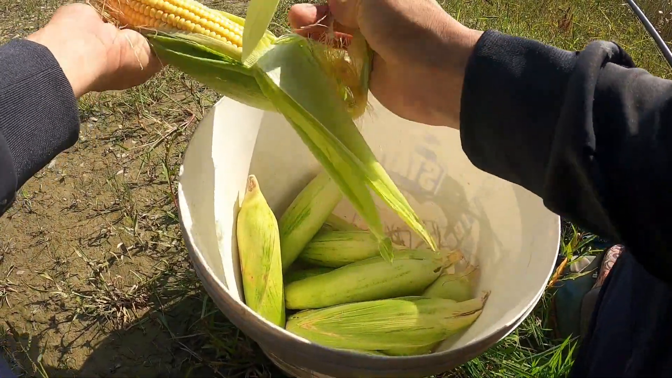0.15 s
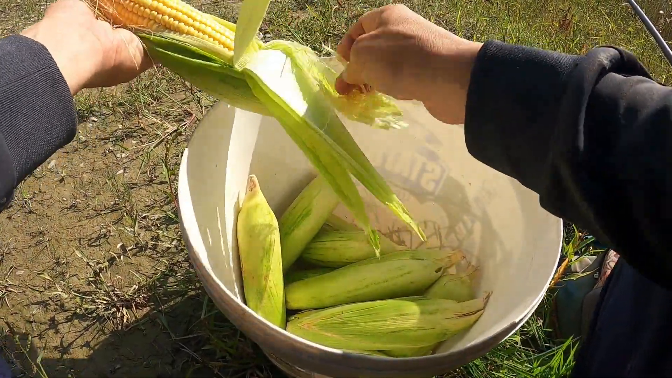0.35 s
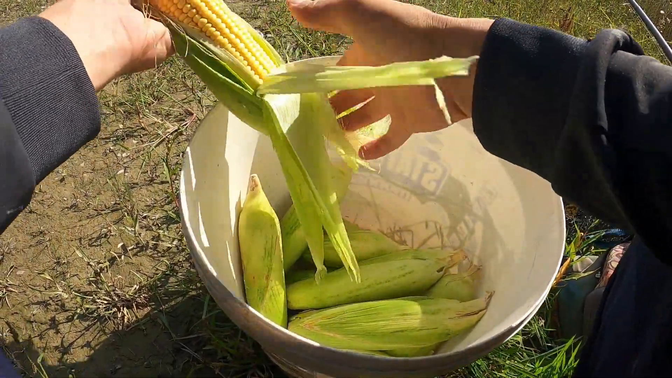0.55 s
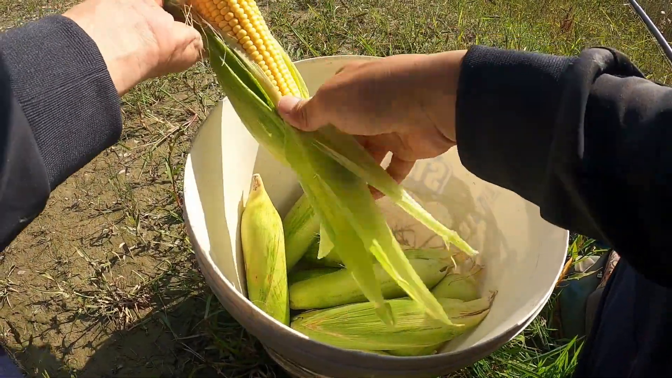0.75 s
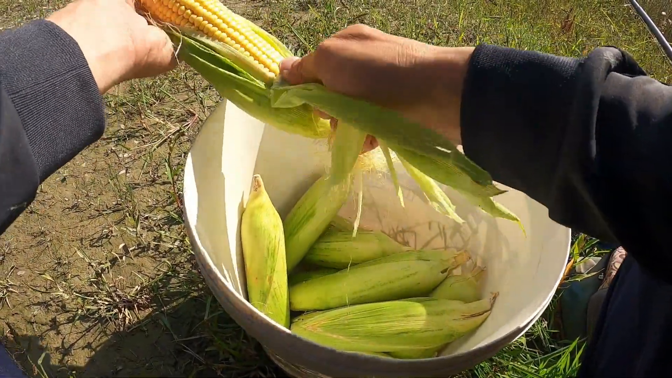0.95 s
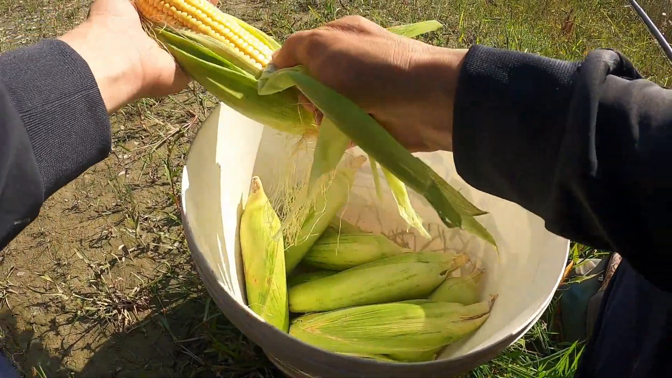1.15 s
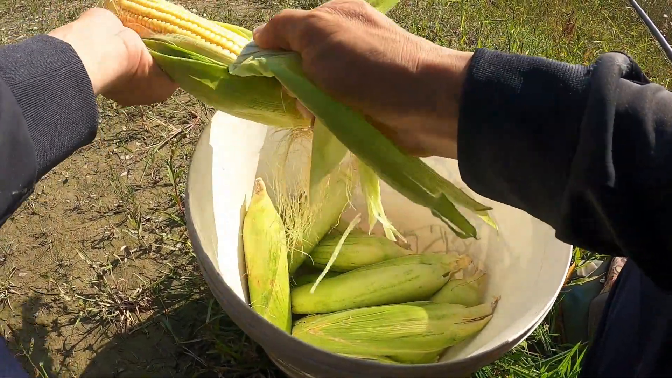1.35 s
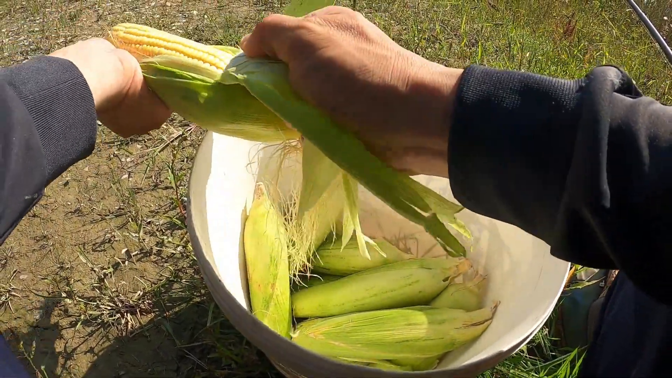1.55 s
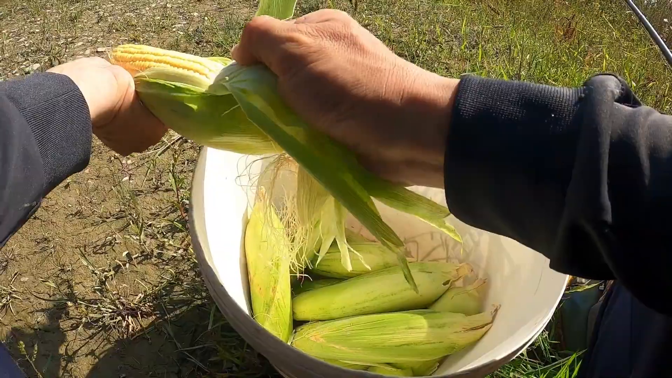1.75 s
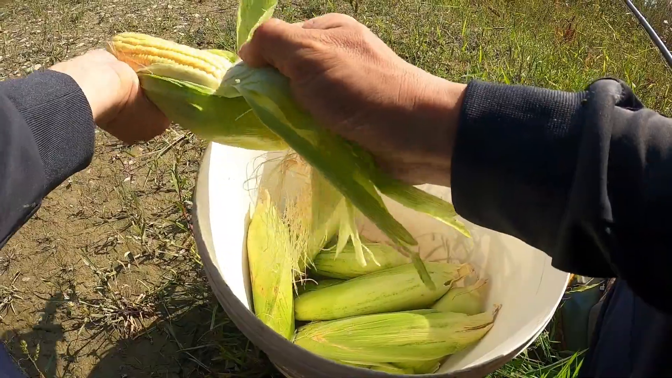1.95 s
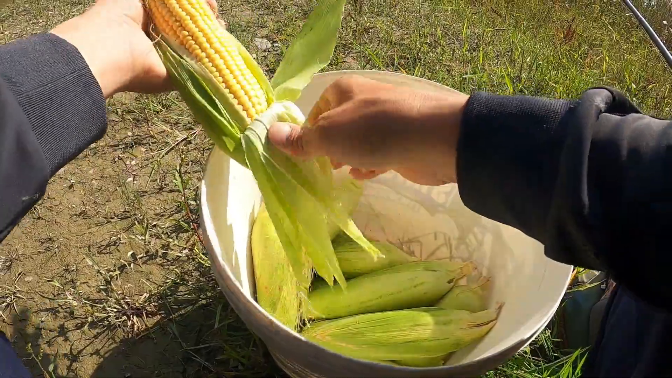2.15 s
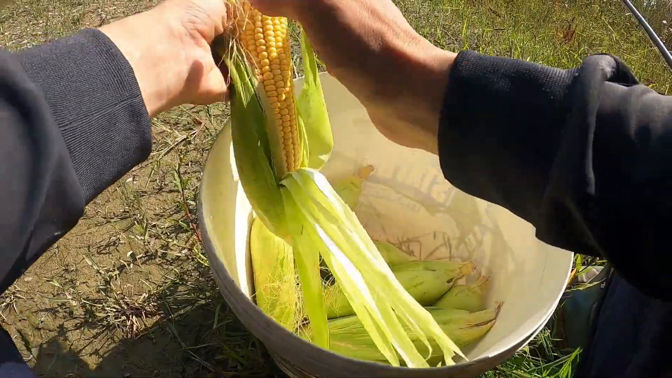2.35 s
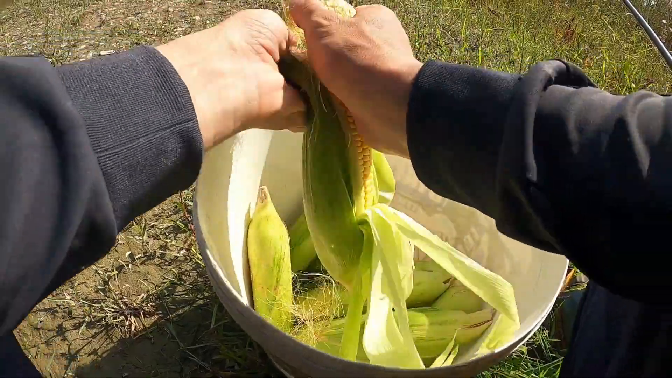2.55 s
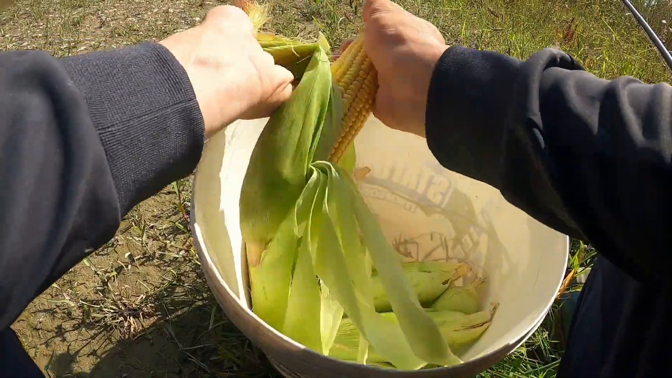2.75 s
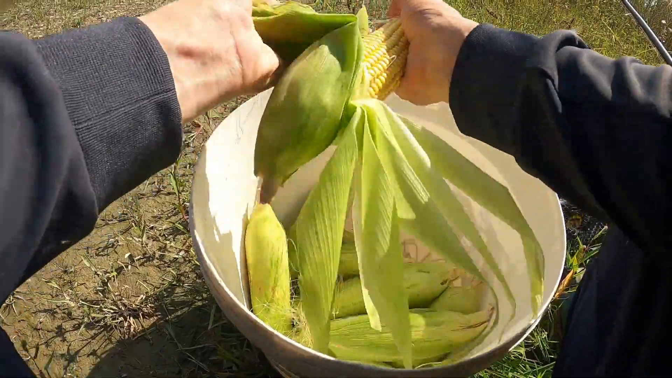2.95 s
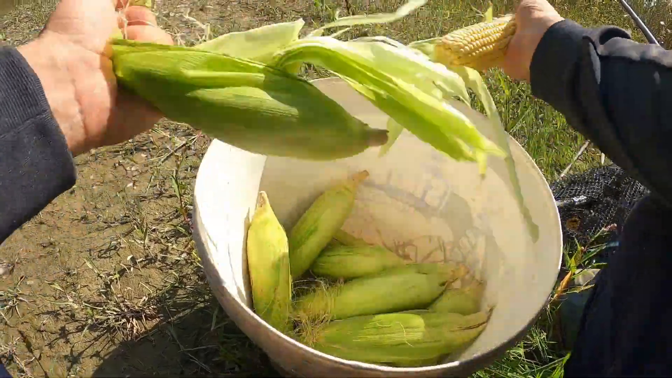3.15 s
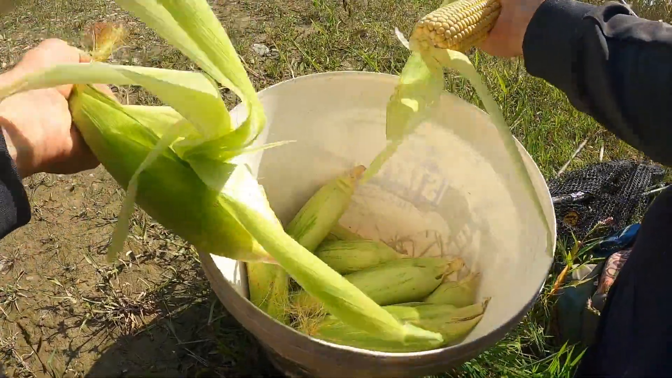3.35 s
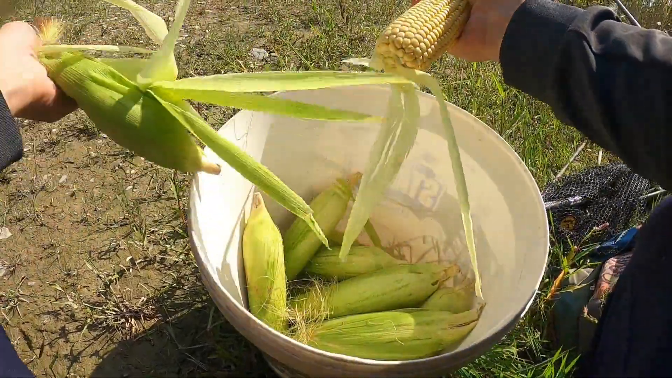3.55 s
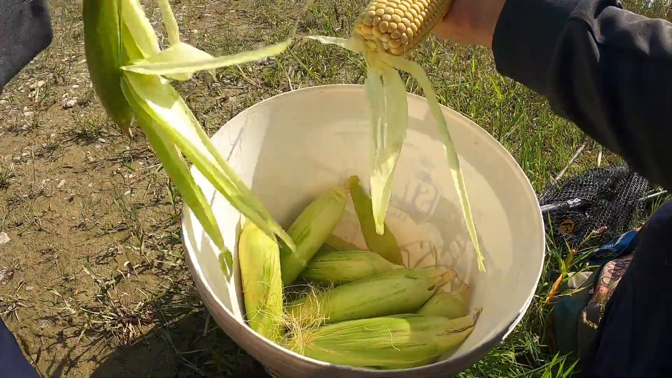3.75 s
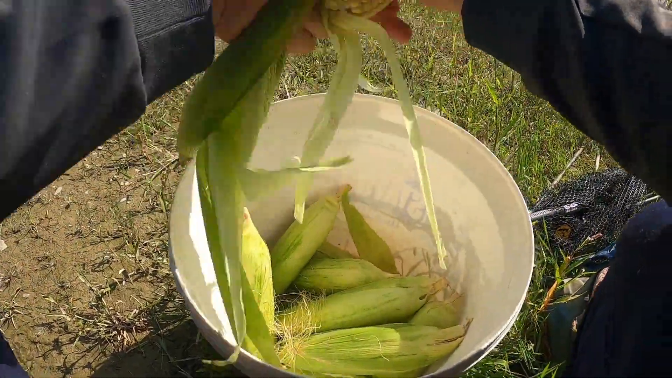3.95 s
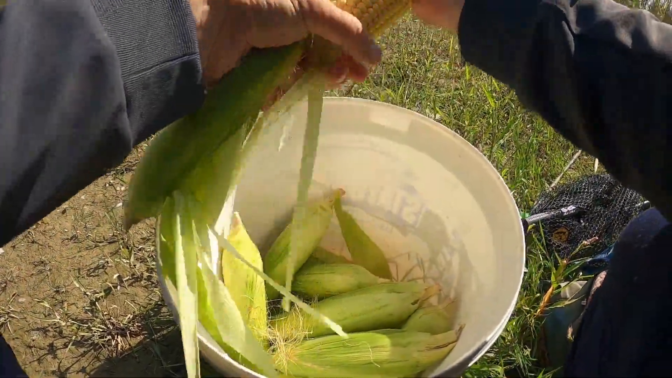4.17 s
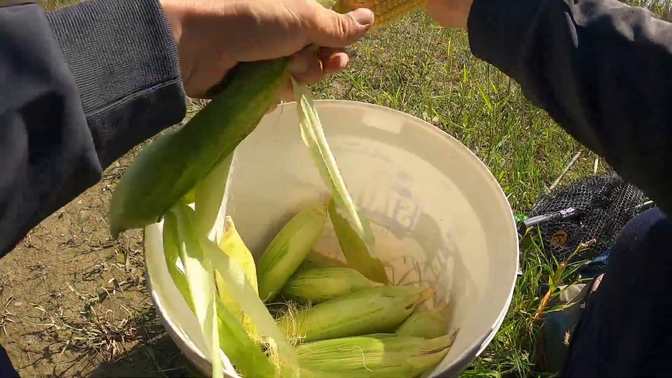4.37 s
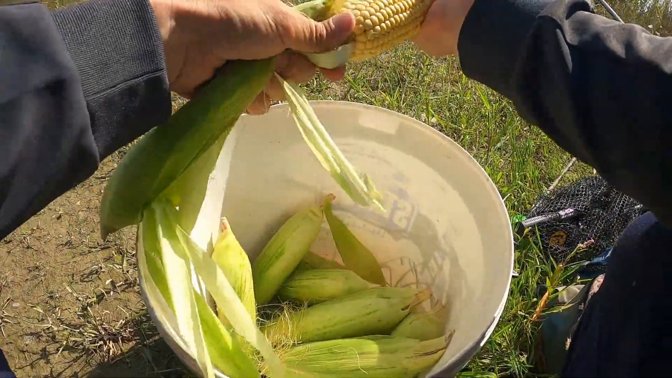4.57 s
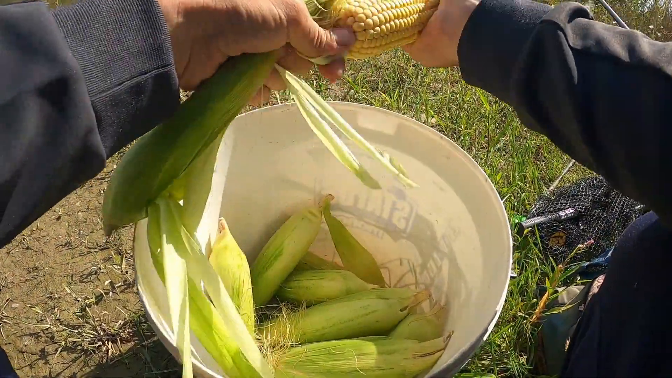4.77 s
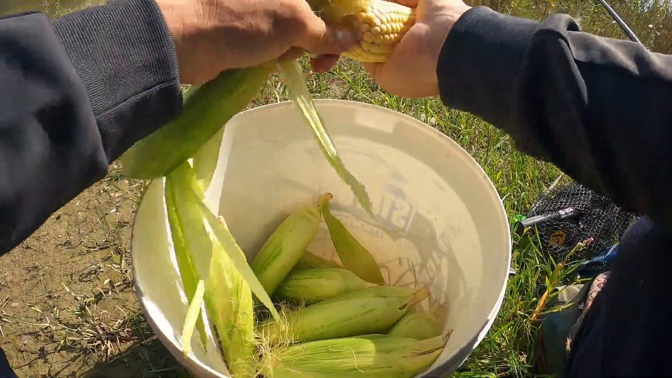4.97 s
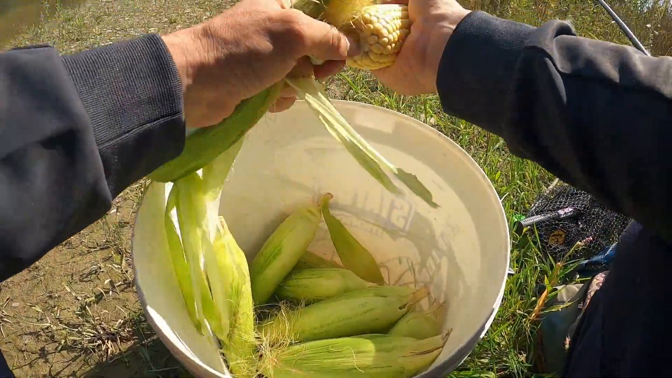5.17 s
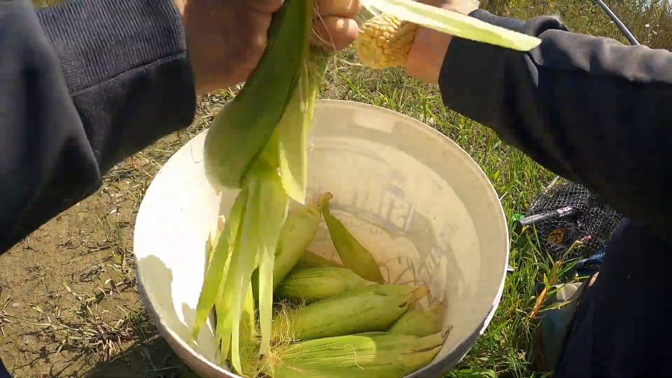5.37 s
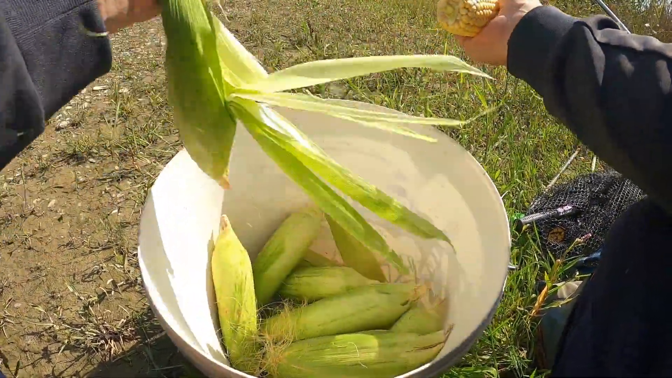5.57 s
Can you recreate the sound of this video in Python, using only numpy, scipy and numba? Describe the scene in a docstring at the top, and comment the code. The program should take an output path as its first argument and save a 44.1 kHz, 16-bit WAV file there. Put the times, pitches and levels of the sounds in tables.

```python
"""Hands strip fresh husks from a corn cob over a plastic bucket, outdoors, close to two microphone ports.
Soft rustling comes first, with light snaps; near 1.7 s sharper snaps and wind join in.
From 2.7 to 3.4 s the leaves creak and tear hardest; blows make the bucket boom from about 3.2 s,
during the tearing, and again near 3.7 and 4 s. Gentle rustling follows, and bright snaps and knocks near 5.4 s.
Tearing is built from tiny decaying sines and noise, knocks from ringing modes, wind from shaped noise."""
import sys
import numpy as np
from scipy import signal
from scipy.fft import rfft, irfft, next_fast_len
from scipy.io import wavfile
from scipy.ndimage import uniform_filter1d, map_coordinates
from numba import njit

SR = 44100
rng = np.random.default_rng(int(sys.argv[2]) if len(sys.argv) > 2 else 0)


def materialize(psi):
    """Save the field psi as 16-bit PCM at rate SR to the path in sys.argv[1].

    A 1-D psi becomes a single channel; in a 2-D psi each row is a channel.
    """
    bounded = np.clip(np.atleast_2d(psi).T, -1, 1)
    quanta = np.round(bounded * 32767).astype(np.int16)
    wavfile.write(sys.argv[1], SR, quanta)


N = 247401  # length in samples

# Separate rubs and rips of the leaves. Each row: start of full level in seconds, time held in seconds,
# crackle level in dB, creak level in dB above the crackle.
LEAF_STROKES = [(0.0, 0.092, -55, -7), (0.189, 0.15, -54, -14), (0.441, 0.045, -56.5, -23),
                (0.693, 0.038, -53, -4), (0.78, .06, -54, -6), (0.869, 0.075, -42, -8),
                (0.97, 0.13, -51.5, -2), (1.097, 0.085, -48, -7.5), (1.35, 0.062, -47, -17),
                (1.481, 0.27, -55, -7.5), (1.803, 0.1, -43.5, -11.5), (2.091, 0.09, -53, -5),
                (2.189, 0.029, -51, 6), (2.292, 0.051, -45, -1), (2.472, 0.39, -52, -5.5),
                (2.702, 0.098, -40, 0.5), (2.831, 0.082, -42, -1), (2.937, 0.027, -30, 0),
                (2.995, 0.011, -35.5, 7), (3.025, 0.095, -33.5, 5.5), (3.17, 0.012, -29.5, 2),
                (3.202, 0.028, -30.5, 2), (3.25, 0.071, -46, 0.5), (3.319, 0.037, -47.5, 4),
                (3.4, 0.055, -58, 2), (3.498, 0.073, -53, 6), (3.633, 0.031, -42.5, 5),
                (3.699, 0.093, -53.5, 8), (3.842, 0.148, -51.5, -4.5), (4.03, 0.0088, -41, 1),
                (4.101, 0.14, -55.5, 0), (4.232, .15, -45, -1), (4.431, 0.044, -52, 1.5),
                (4.504, 0.0094, -43, -26), (4.56, 0.17, -59.5, -1), (4.82, 0.049, -60, -4),
                (4.921, 0.21, -55.5, 4.5), (5.15, 0.12, -63, -26.5), (5.3, 0.073, -52, 0),
                (5.402, 0.037, -42.5, -4.5), (5.5, 0.052, -54.5, -0.5), (5.598, 0.018, -45.5, 2.5)]
# Tone of the fine crackle. Each row: frequency in Hz, relative level in dB.
CRACKLE_TONE = [(410, -26), (911, -86), (1370, -53), (1590, -8.5), (2580, -10), (3400, -4.5), (4550, -0.5),
                (7510, -14), (9040, -14), (12200, -26.5), (15100, -17), (16400, -43)]
# Drifting centre of the creaking. Each row: time in seconds, pitch in Hz.
CREAK_CENTRE = [(0, 1720), (2.7, 1940), (2.97, 1900), (3.02, 1230), (3.62, 1696), (3.72, 1090), (4.2, 1650),
                (5.61, 1750)]
# Leaves brushing the bucket wall. Each row: time in seconds, level in dB.
WALL_BRUSHING = [(0.0, -60.5), (0.42, -74.5), (0.84, -61), (0.92, -46), (1.15, -73.5), (2.05, -76),
                 (2.2, -46), (2.27, -59), (2.36, -47), (2.43, -67), (2.9, -49.5), (3.18, -37), (3.45, -60),
                 (3.73, -37.5), (3.82, -48.5), (4.0, -61), (4.07, -42), (4.16, -65), (4.3, -47),
                 (4.68, -76), (5.0, -64), (5.28, -71.5), (5.33, -53), (5.47, -42), (5.55, -66), (5.61, -33)]
# Fibres that snap. Each row: start in seconds, level in dB, treble in dB above that level.
FIBRE_SNAPS = [(0.03, -37.5, -10), (0.051, -37.5, -13), (0.1143, -35.5, -25), (0.1605, -21.5, 9),
               (0.2049, -32.5, -16), (0.8661, -37, -22), (0.9308, -38, -30), (0.9976, -26.5, -21),
               (1.3523, -38.5, -22), (1.365, -38, -15), (1.46, -21.5, 2.5), (1.5847, -21, -9),
               (1.6423, -30.5, -3), (1.6866, -11, -2.5), (1.7034, -26, -17), (1.7998, -29, 3),
               (1.816, -32, -12), (1.8397, -20.5, 0), (1.8587, -11, -10), (1.8824, -21, -22),
               (1.8901, -21.5, -1), (1.943, -35, 7), (1.968, -36.5, -25), (1.9978, -38, 4),
               (2.02, -41.5, 3), (2.368, -30.5, -2.5), (2.443, -35.5, -19), (2.7412, -21.5, -6),
               (2.7607, -16, -43), (2.9354, -21, -19), (2.9438, -14, -19), (2.9554, -17, -17),
               (2.9654, -15.5, -14.5), (3.1712, -11, -13), (3.2007, -23, -6), (3.2106, -7, -7),
               (3.2204, -19, -30), (3.337, -11.5, -35), (3.3747, -24, -7), (3.8667, -29.5, -9),
               (3.9182, -30.5, 0), (4.0253, -21.5, -20), (4.2726, -29, -8), (4.3596, -27, -2),
               (5.0948, -32, 10), (5.1891, -50.5, 25), (5.3984, -36.5, 24), (5.4204, -25.5, 6),
               (5.4292, -18.5, 10.5), (5.5932, -24.5, -11)]
# A leaf slips and creaks at one pitch. Each row: start in seconds, level in dB, pitch in Hz.
LEAF_CREAKS = [(0.161, -18, 1940), (1.841, -24, 1800), (1.858, -17, 1050), (2.209, -15, 1885),
               (2.695, -14.5, 1595), (2.708, -7, 2020), (2.727, -8, 2060), (2.739, -3.5, 1710),
               (2.756, 0, 2110), (2.794, -7, 1670), (2.945, -13, 1046), (2.992, -15.5, 980),
               (3.021, -10, 1000), (3.042, -4.5, 1560), (3.065, -0.5, 1990), (3.078, -21, 1020),
               (3.092, -5, 1040), (3.107, -13, 950), (3.119, -6, 1010), (3.156, -7, 1495),
               (3.181, -13, 1150), (3.705, -19.5, 1030), (3.78, -24.5, 1020), (3.316, -5.5, 1215),
               (3.337, -8.5, 913)]
# Blows on the bucket. Each row: start in seconds, level in dB, deep thud in dB above it, rim in dB above it.
BUCKET_BLOWS = [(0.865, -35, -46, -40), (0.942, -35, -51, 0.5), (1.858, -37.5, -24, -5),
                (3.172, -18, -12, 10), (3.214, -16.5, -4, 6.5), (3.319, -21, -11, -3),
                (3.341, -20, -0.5, 0), (3.692, -21.5, -28, 6), (3.715, -31.5, -34, 2),
                (4.027, -11, -22.5, 3.5), (4.27, -33, -5, 2), (5.422, -20.5, -14, -1.5),
                (5.434, -18, -14.5, 4.5), (5.457, -22, -37, 3.5)]
# Ringing of the bucket's body. Each row: frequency in Hz, relative level in dB, time to fall 60 dB in seconds.
BODY_MODES = [(129.4, -19, 0.275), (221, -14, 0.31), (248, 3, 0.11), (318.6, 9, 0.035), (409.6, -5, 0.079)]
# Ears shifting in the bucket. Each row: frequency in Hz, relative level in dB, time to fall 60 dB in seconds.
THUD_MODES = [(52.4, -2, 0.071), (71.8, 6.5, 0.095), (108, 11, 0.042)]
# Ringing of the stiff rim. Each row: frequency in Hz, relative level in dB, time to fall 60 dB in seconds.
RIM_MODES = [(432, -3, 0.052), (552.2, 2.5, 0.033), (778, -3, 0.031), (970, -2, 0.024), (1086, -6, 0.048),
             (1372, -5.5, 0.026), (1930, -10, 0.02)]
# Wind on the ports. Each row: time in seconds, rumble level in dB, flutter level in dB.
WIND_LEVELS = [(0.0, -53.5, -79), (0.62, -60.5, -97.5), (0.86, -60.5, -88), (1.27, -54, -98),
               (1.62, -54.5, -78), (1.74, -41.5, -54), (1.9, -37.5, -57), (2.03, -45, -53),
               (2.2, -56.5, -76), (2.33, -38.5, -49), (2.73, -47.5, -75.5), (3.11, -57, -69),
               (3.23, -33, -54), (3.28, -60, -52), (3.36, -39, -48.5), (3.47, -60.5, -57),
               (3.94, -46.5, -55), (4.89, -48.5, -70), (5.26, -41, -59.5), (5.61, -46, -64)]
# Tone of the low wind rumble. Each row: frequency in Hz, relative level in dB.
RUMBLE_TONE = [(10, -10.5), (25, -1.5), (45, -5.5), (62, -18), (120, -61.5)]
# Tone of the higher wind flutter. Each row: frequency in Hz, relative level in dB.
FLUTTER_TONE = [(30, -9), (60, 8.5), (100, 16), (160, -4), (400, -67)]
# Tone of the open-air background. Each row: frequency in Hz, relative level in dB.
OPEN_AIR_TONE = [(110, -28), (160, -1), (400, -11.5), (800, -26.5), (1500, -16), (2600, -23), (5000, -21),
                 (12000, -38.5), (16400, -68)]
# Response shared by both ports. Each row: frequency in Hz, gain in dB.
PORT_RESPONSE = [(100, 1), (12000, 1.5), (15000, -10.5), (16500, -26)]
# How the right port differs. Each row: frequency in Hz, gain in dB over the left.
RIGHT_OVER_LEFT = [(100, 0), (5000, -0.5), (8000, 5), (15000, 5)]

TOP_HZ = 16500  # nothing is kept from here up
ATTACK_S, RELEASE_S, REST_DB = 0.06, 0.101, -80.5  # a stroke climbs from the resting rustle and returns to it
RIP_FROM_DB = -41  # crackle above this level counts as a hard rip
RIP_SNAPS_PER_S = 120  # chance snaps a second in hard rips
GENTLE_SHARE = .14  # share of them left in gentle strokes
RIP_SNAP_DB, RIP_TREBLE_DB = 12, -11  # greatest level over the crackle; treble over the snap's own level


def amp(db):
    """Turns dB into a plain gain."""
    return 10 ** (np.asarray(db) / 20)


def unit(x):
    """Scales x to an average strength (rms) of 1."""
    return x / np.sqrt(np.mean(x ** 2) + 1e-20)


def along(points, hz):
    """Reads a curve of (Hz, value) points on a log frequency axis."""
    f, v = np.transpose(points)
    return np.interp(np.log(hz + 1), np.log(f + 1), v)


def curves(rows):
    """Gives one value per sample for each column after the time."""
    s, *cols = np.transpose(rows)
    return [np.interp(np.arange(N) / SR, s, c) for c in cols]


def wobble(rate):
    """A smooth random curve with `rate` random points a second."""
    points = rng.standard_normal(int(N * rate / SR) + 4)
    return map_coordinates(points, [np.arange(N) * rate / SR])


def filtered(x, response):
    """Shapes x by a gain that depends on frequency."""
    m = next_fast_len(N + SR // 2)
    return irfft(rfft(x, m) * response(np.fft.rfftfreq(m, 1 / SR)), m)[..., :N]


def pair(alike):
    """Two white noises, one per port; alike is their correlation."""
    a, b = rng.standard_normal((2, N))
    turn = np.arccos(np.clip(alike, -1, 1)) / 2
    shared, own = np.cos(turn) * a, np.sin(turn) * b
    return np.array([shared + own, shared - own])


@njit
def add(out, start, step, fade, rise, size):
    """Adds damped sines to out: each swells, then dies away; times are in samples."""
    for g in range(len(start)):
        first = int(start[g]) + 1
        for n in range(max(first, 0), min(first + int(6 / fade[g]), len(out))):
            t = n - start[g]
            envelope = np.exp(-fade[g] * t) * (1 - np.exp(-t / rise[g]))
            out[n] += size[g] * np.sin(step[g] * t) * envelope


def rings(s, hz, t60, db, rise, lag, pan_db):
    """Damped sines at both ports: the left hears each up to lag seconds later and pan_db louder."""
    values = np.broadcast_arrays(s, hz, t60, db, rise, lag, pan_db)
    s, hz, t60, db, rise, lag, pan_db = [np.ravel(v) * 1. for v in values]
    lag = lag / (1 + (hz / 8000) ** 2)  # high pitches lag less
    step = 2 * np.pi * np.clip(hz, 20, SR / 2.2) / SR
    fade = np.log(1000) / np.clip(t60, 1e-4, 1) / SR
    rise = np.clip(rise, 1e-5, 1) * SR
    out = np.zeros((2, N))
    for port, side in zip(out, (.5, -.5)):
        add(port, (s + side * lag) * SR, step, fade, rise, amp(db + side * pan_db))
    return out


def handling():
    """Rubbed and torn leaves give fine crackle and coarser creaking, and set the bucket wall humming."""
    crackle_db, creak_db = stroking()
    # gentle strokes mostly slide, hard ones break fibres
    torn = np.clip((crackle_db + 80) / 55, .2, .9)
    jerks = unit(amp(5 * torn * wobble(75)))  # fibres give way in jerks
    leaves = amp(crackle_db) * leaf_crackle(torn) + amp(creak_db) * leaf_creaking(torn)
    return jerks * leaves + amp(curves(WALL_BRUSHING)[0]) * wall_brush()


def stroking():
    """Crackle and creak levels in dB: each stroke rises, holds and falls; strokes add in power."""
    s, held, crackle_db, creak_db = np.transpose(LEAF_STROKES)[..., None]
    times = np.arange(0, N, 64) / SR
    t = times - s
    edges = np.minimum(t, 0) / ATTACK_S - np.maximum(t - held, 0) / RELEASE_S
    shape_db = np.abs(crackle_db - REST_DB) * edges

    def total(db):
        return 10 * np.log10(np.sum(amp(db + shape_db) ** 2, 0) + amp(REST_DB) ** 2)

    return curves(np.transpose([times, total(crackle_db), total(crackle_db + creak_db)]))


def leaf_crackle(torn):
    """Tiny fibre breaks over a sliding hiss; harder tearing gives more breaks in the mix."""
    fine = grains(count=12000, hz=5600, octaves=1.1, decay_cycles=1.35, spiky_db=4, clump_db=3, pan_db=6)
    hiss = unit(amp(2.5 * wobble(80)) * pair(.7))
    rub = patchy(np.sqrt(torn) * fine + np.sqrt(1 - torn) * hiss, depth_db=2.2)
    return unit(filtered(rub, lambda hz: amp(along(CRACKLE_TONE, hz))))


def leaf_creaking(torn):
    """Longer breaks around a drifting pitch, over scraping noise that shifts between two bands."""
    pitch_hz, = curves(CREAK_CENTRE)
    coarse = grains(count=9000, hz=pitch_hz, octaves=.45, decay_cycles=4.5, spiky_db=3, clump_db=3, pan_db=2.5)

    def band(hz):
        return unit(filtered(pair(0.58), lambda f: np.exp(-(np.log2((f + 1) / hz) / 1.13) ** 2)))

    upper = np.clip(np.log2(pitch_hz / 1000), 0, 1)  # share of the upper band
    scrape = np.sqrt(1 - upper) * band(hz=1080) + np.sqrt(upper) * band(hz=1950)
    return unit(patchy(np.sqrt(torn) * coarse + np.sqrt(1 - torn) * scrape, depth_db=4.5))


def wall_brush():
    """Uneven brushing noise passes through the resonances of the bucket's body."""
    def wall(f):
        total = 0
        for k, (centre, db, t60) in enumerate(BODY_MODES):
            resonance = 1j * f * 14 / (centre * centre - f * f + 1j * f * 5.5 / t60)
            total = total + (-1) ** k * amp(db) * resonance
        return total

    def response(f):
        low_cut = f ** 2 / (f ** 2 + 160 ** 2)
        return wall(f) * low_cut / (1 + (f / 750) ** 4)

    strokes = amp(2.5 * wobble(30))
    return unit(filtered(strokes * pair(0.99), response))


def grains(count, hz, octaves, decay_cycles, spiky_db, clump_db, pan_db):
    """Random tiny fibre breaks of rms 1, in clumps; each falls 60 dB in decay_cycles of its pitch."""
    a, b, c = rng.standard_normal((3, count))
    s = rng.uniform(0, N / SR, count)
    sample = (s * SR).astype(int)
    pitch = np.broadcast_to(hz, N)[sample] * 2 ** (octaves * a)
    spikes_db = spiky_db * np.minimum(rng.exponential(1, count), 3.5)
    db = spikes_db + clump_db * wobble(90)[sample]
    return unit(rings(s, pitch, decay_cycles / pitch, db, .3 / pitch, 3.5e-5 + 3e-5 * b, pan_db * c))


def patchy(x, depth_db):
    """Leaf resonances come and go: random gain in patches of a few hundred Hz and a tenth of a second."""
    z = signal.stft(x, nperseg=512)[2]
    field = uniform_filter1d(rng.standard_normal(z.shape[1:]), size=5, axis=0)  # across frequency
    field = uniform_filter1d(field, size=18, axis=1)  # across time
    return signal.istft(z * amp(depth_db * unit(field)), nperseg=512)[1][:, :N]


def snaps():
    """A snap shakes many short leaf modes at once: a body around 4 kHz and a ragged treble tick."""
    s, db, treble_db = np.vstack([FIBRE_SNAPS, rip_snaps()]).T[..., None]
    ladder = np.linspace(-1, 1, 24)  # places of the modes from low to high
    # centre in Hz, spread in octaves, decay in s, raggedness in s, level in dB
    parts = ((4030, 1.077, 0.0075, 0.000082, db - 15.5),
             (9420, 1.18, 0.002, 0.00076, db + treble_db - 14.5))
    out = 0
    for hz, octaves, t60, ragged, level_db in parts:
        a, b, c = np.moveaxis(rng.standard_normal((len(s), 24, 3)), -1, 0)
        # every mode strays a little, and each snap shifts as a whole
        pitch = hz * 2 ** (octaves * ladder + 0.052 * a + 0.25 * a[:, :1])
        slope_db = -5 * ladder ** 2 + 2 * c
        decay = t60 * (hz / pitch) ** .6
        out = out + rings(s + ragged * b ** 2, pitch, decay, level_db + slope_db, 6e-5,
                          3.5e-5 + 1.5e-5 * c, 1.5 * b)
    return filtered(out, lambda f: (1j * f / (1j * f + 500)) ** 2)  # thins out the bass


def rip_snaps():
    """Rows of chance snaps: they crowd the hard rips and thin out to stray ticks in gentle strokes."""
    place, size, lot = rng.uniform(0, 1, (int(RIP_SNAPS_PER_S * N / SR), 3)).T
    crackle_db = np.interp(place * N, np.arange(N), stroking()[0])
    db = crackle_db + RIP_SNAP_DB - 10 * size
    rows = np.transpose([place * N / SR, db, np.full_like(db, RIP_TREBLE_DB)])
    return rows[(crackle_db > RIP_FROM_DB) | (lot < GENTLE_SHARE)]


def creaks():
    """Stick-slip near one pitch: close partials and rough overtones, spread over a few milliseconds."""
    s, db, hz = np.transpose(LEAF_CREAKS)[..., None]
    a, b = np.moveaxis(rng.standard_normal((len(s), 9, 2)), -1, 0)
    order = np.array([1, 1, 1, 1, 1.2, 1.5, 2, 2.5, 3])  # multiples of the pitch
    looseness = np.linspace(.02, .25, 9)  # pitch scatter in octaves; looser partials are softer
    pitch = order * hz * 2 ** (looseness * a)
    level_db = db - 14.0 - 45 * looseness
    return rings(s + 0.00298 * np.abs(b), pitch, 20 / pitch, level_db, 0.00019, 3.5e-5, 0.65 * b)


def bucket_echo(x, t60):
    """Bucket, leaves and ground return a short scattered echo, drawn anew so that its colour varies."""
    t = np.arange(SR // 20) / SR
    hop = SR // 12  # a new random echo twelve times a second
    padded = np.pad(x, ((0, 0), (0, hop)))
    out = np.zeros((2, N + SR))
    for start in range(0, N, hop):
        a, b = rng.standard_normal((2, len(t))) * amp(-60 * t / t60) * (t > .0008)
        tail = np.array([a + 0.83 * b, a - 0.058 * b]) / np.linalg.norm(a)
        echo = signal.fftconvolve(padded[:, start:start + hop], tail, axes=1)
        out[:, start:start + hop + len(t) - 1] += echo
    return out[:, :N]


def knocks():
    """Each blow rings the bucket at new strengths; the heavy ears inside shift a moment later."""
    s, db, thud_db, rim_db = np.transpose(BUCKET_BLOWS)[..., None]
    # modes, level in dB, delay in s, rise in s
    parts = ((BODY_MODES, db - 4.5, .0012, .002),
             (THUD_MODES, db + thud_db, .006, .004),
             (RIM_MODES, db + rim_db - 8.5, .001, .0008))
    out = 0
    for modes, level_db, late, rise in parts:
        hz, mode_db, t60 = np.transpose(modes)
        scatter_db = rng.normal(0, 2, (len(s), len(hz)))
        out = out + rings(s + late, hz, t60, level_db + mode_db + scatter_db, rise, 3.5e-5, 0)
    return out


def outdoors():
    """Wind lumps on the ports, slow rumble and quicker flutter, over a faint open-air hiss."""
    rumble_db, flutter_db = curves(WIND_LEVELS)
    rumble_noise = amp(2.6 * wobble(7.42)) * pair(0.45)
    rumble = unit(filtered(rumble_noise, lambda hz: amp(along(RUMBLE_TONE, hz))))
    flutter_noise = amp(4.3 * wobble(54)) * pair(0.81)
    flutter = unit(filtered(flutter_noise, lambda hz: amp(along(FLUTTER_TONE, hz))))
    hiss = unit(filtered(pair(0.48), lambda hz: amp(along(OPEN_AIR_TONE, hz))))
    return amp(rumble_db) * rumble + amp(flutter_db) * flutter + amp(-62.0) * hiss


def scene():
    """Adds up all the sounds; only the snaps and single creaks get the echo."""
    leaves = snaps() + creaks()
    echo = amp(-3) * bucket_echo(leaves, t60=0.03)
    return handling() + leaves + echo + knocks() + outdoors()


def record(dry):
    """The right port is brighter; the treble rolls off and nothing is kept above the band limit."""
    def response(hz):
        difference_db = along(RIGHT_OVER_LEFT, hz) * [[-.5], [.5]]  # half to each port
        return amp(along(PORT_RESPONSE, hz) + difference_db) * (hz < TOP_HZ)

    return filtered(dry, response)


dry = scene()
out = record(dry)
materialize(out)
```